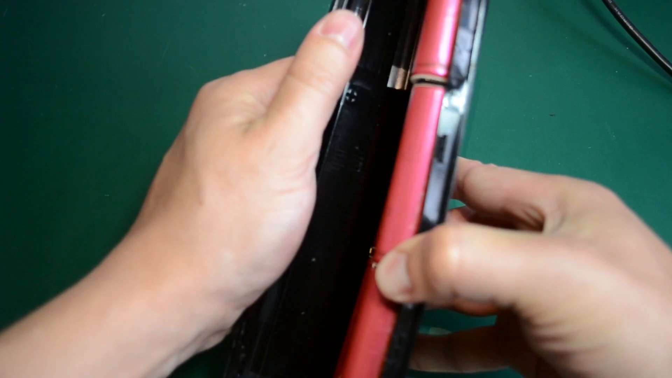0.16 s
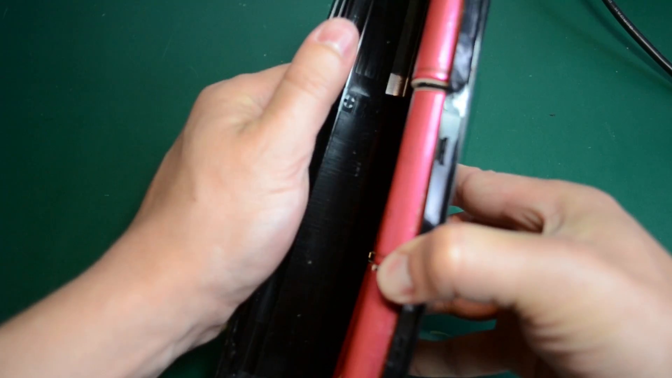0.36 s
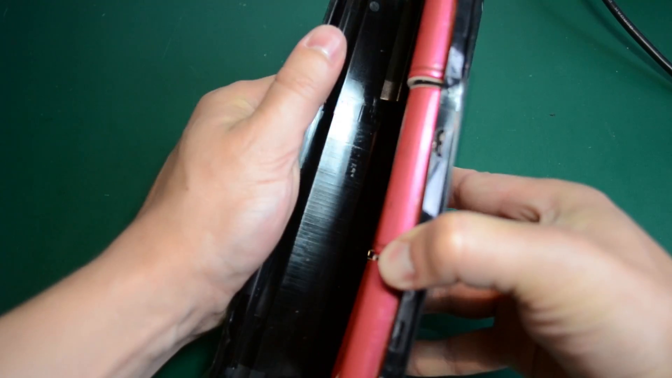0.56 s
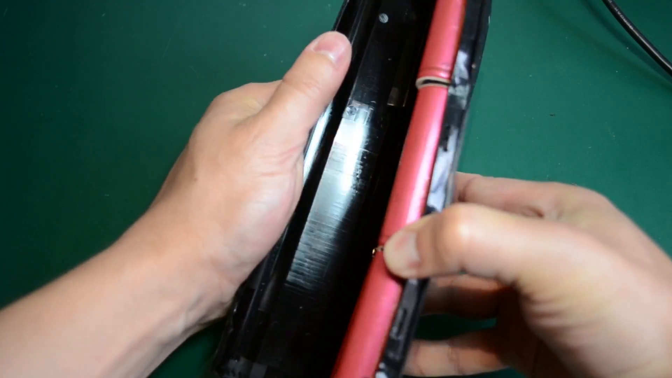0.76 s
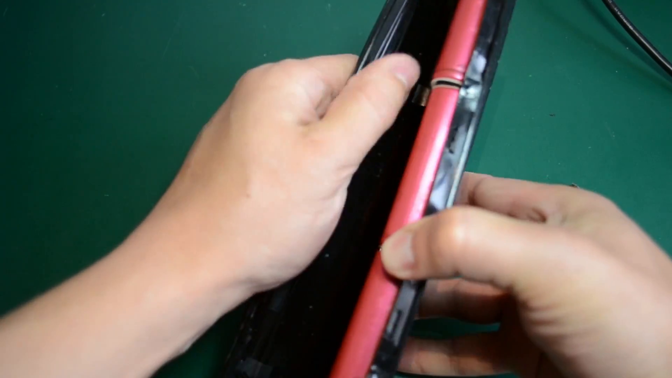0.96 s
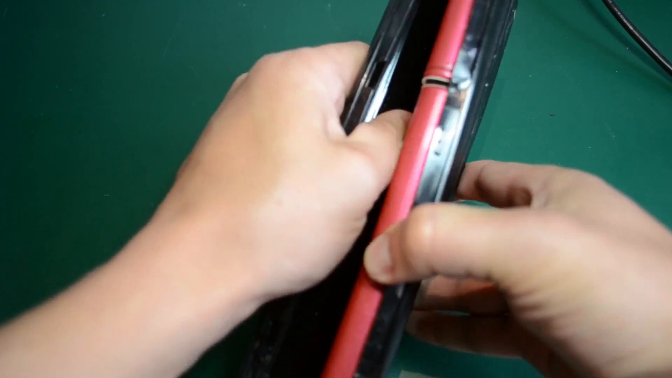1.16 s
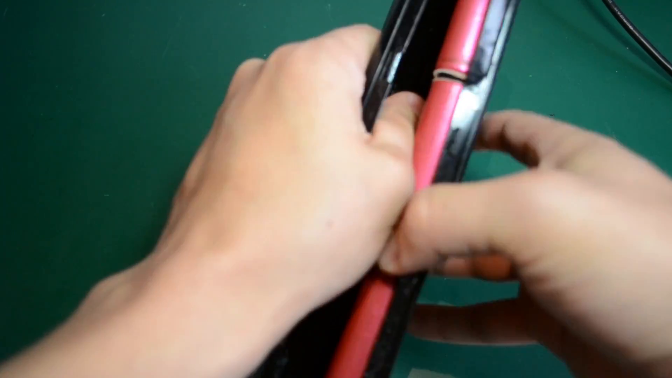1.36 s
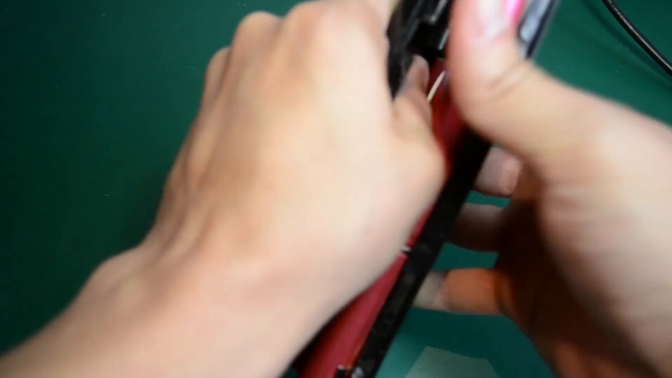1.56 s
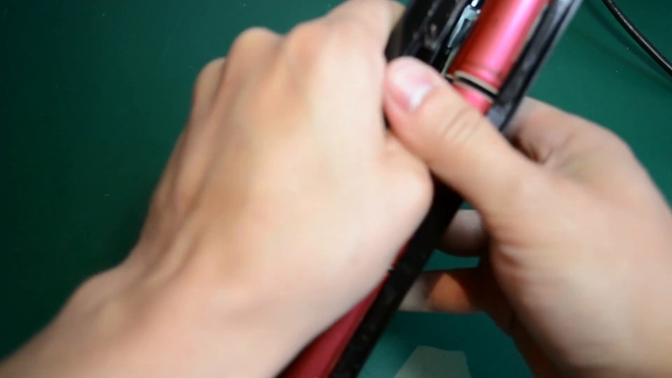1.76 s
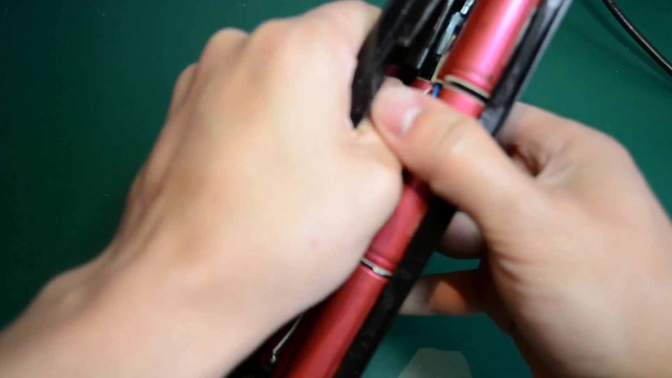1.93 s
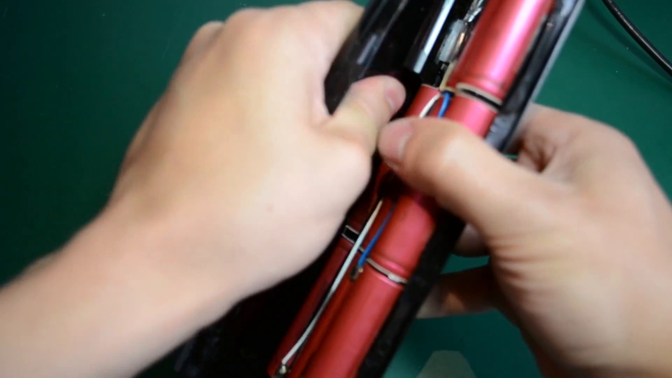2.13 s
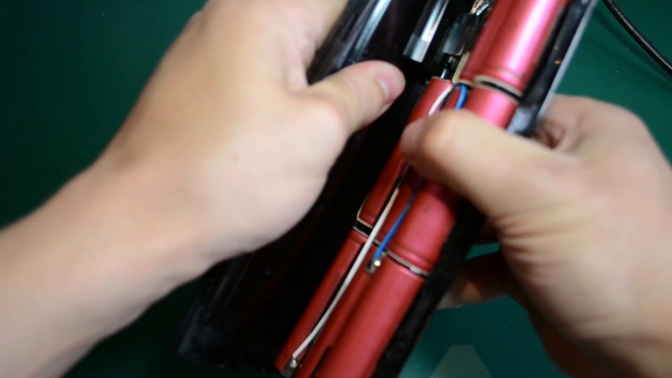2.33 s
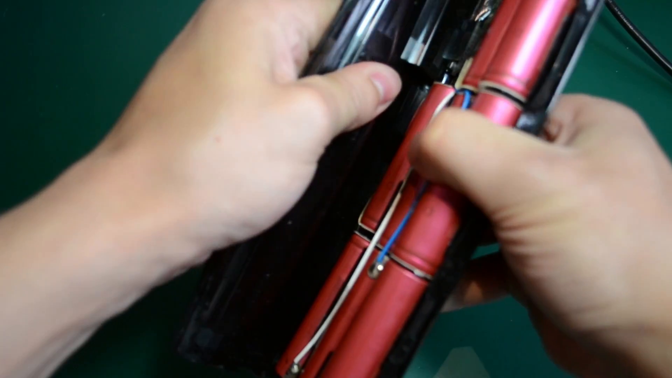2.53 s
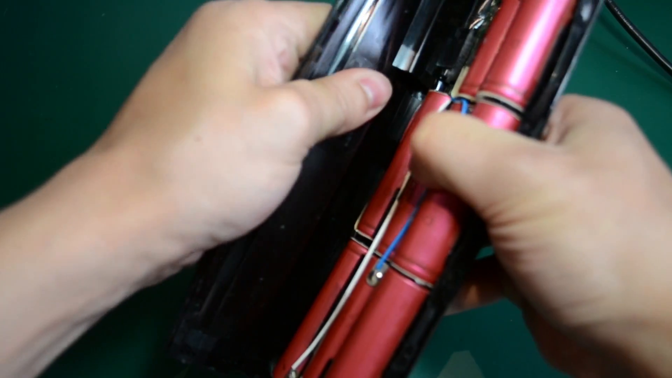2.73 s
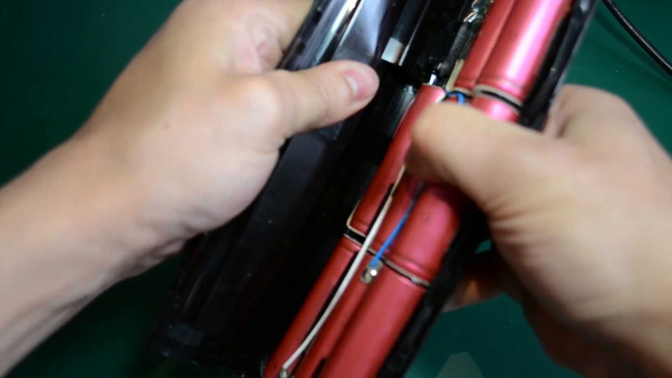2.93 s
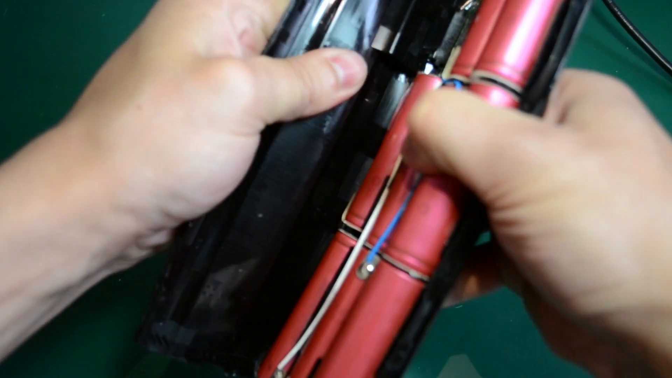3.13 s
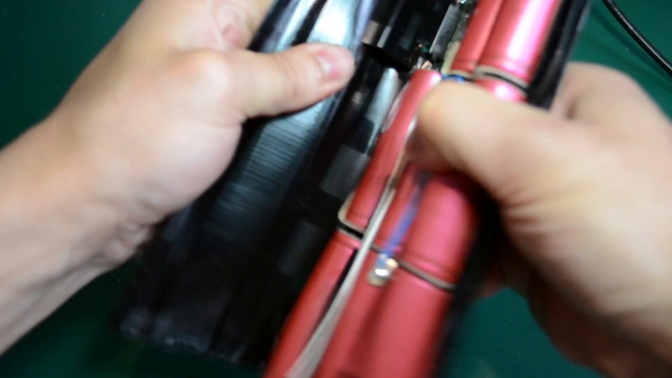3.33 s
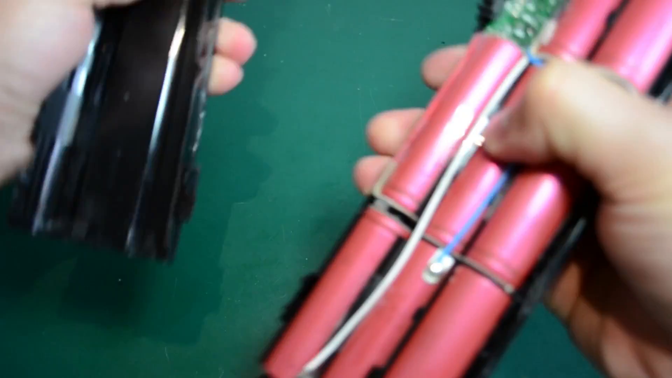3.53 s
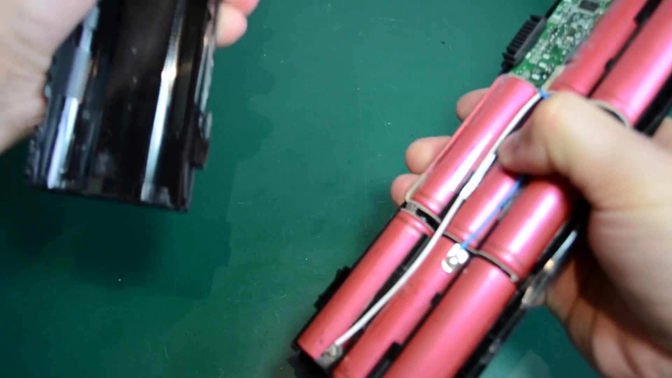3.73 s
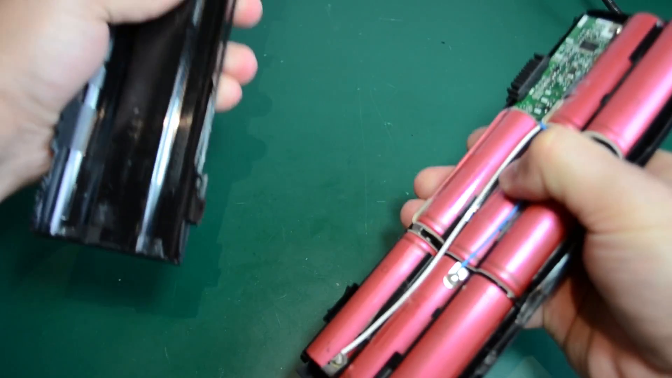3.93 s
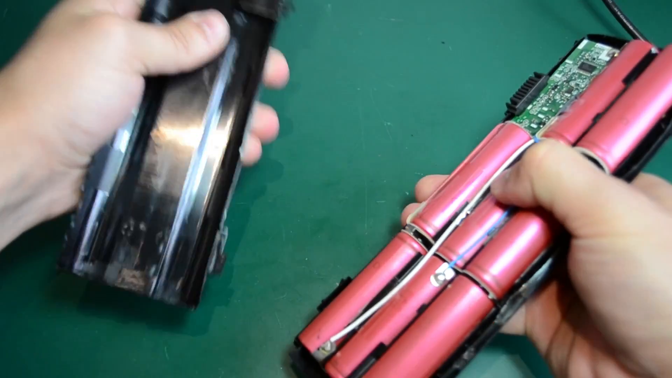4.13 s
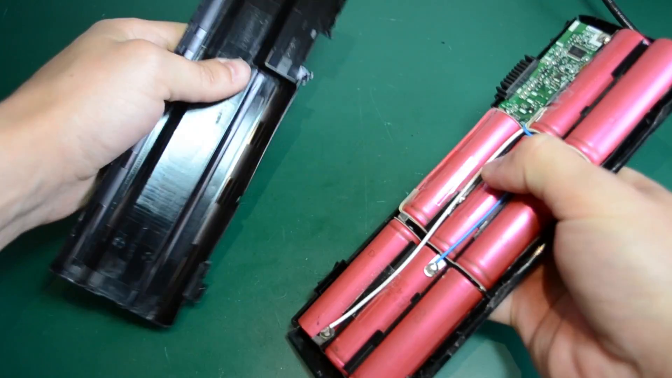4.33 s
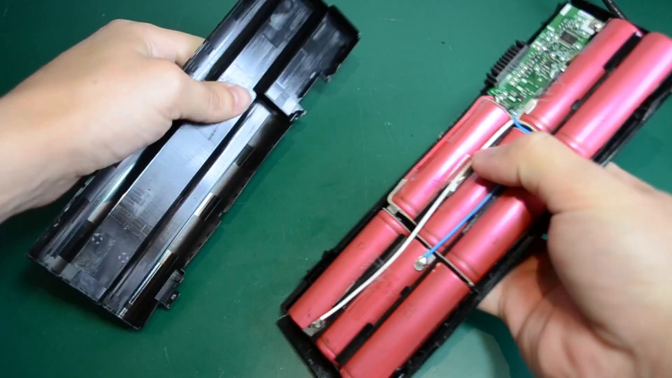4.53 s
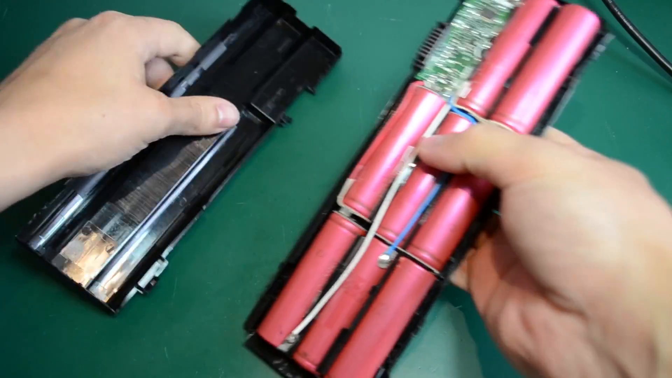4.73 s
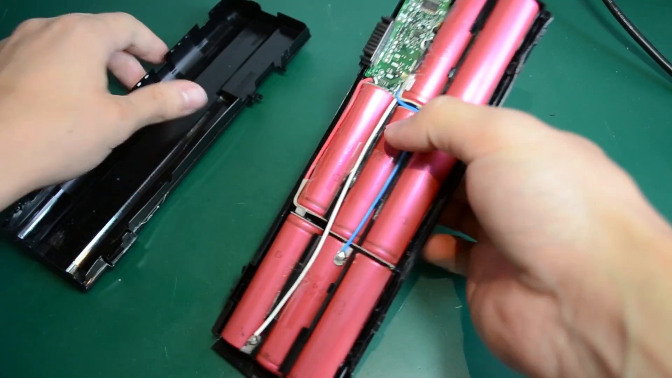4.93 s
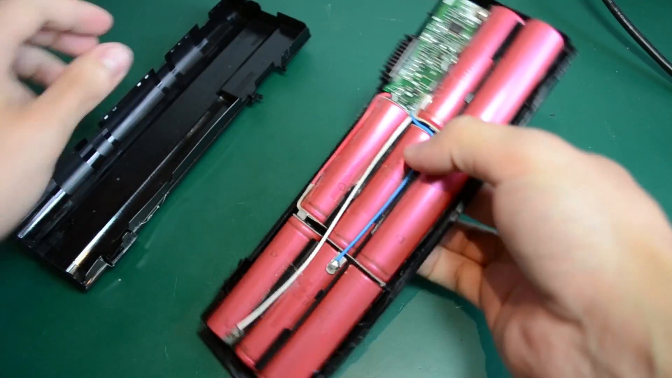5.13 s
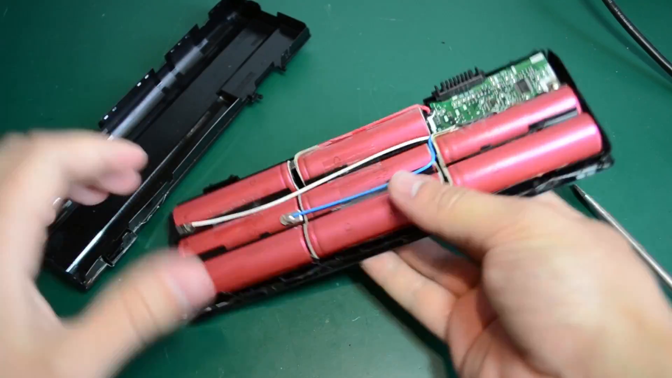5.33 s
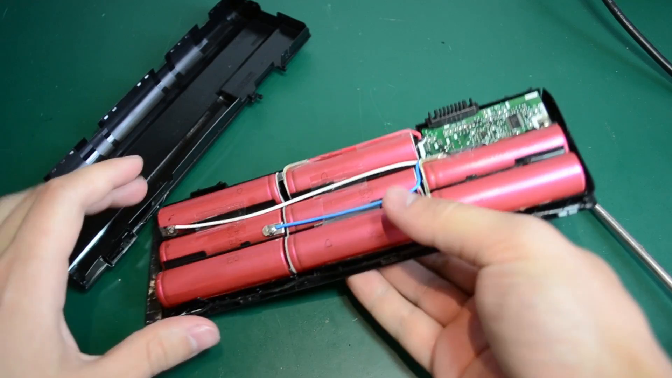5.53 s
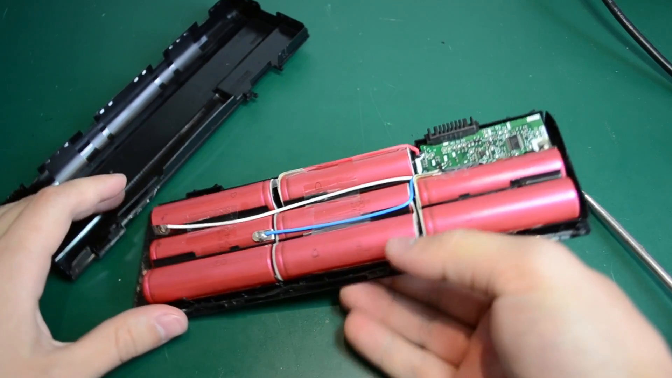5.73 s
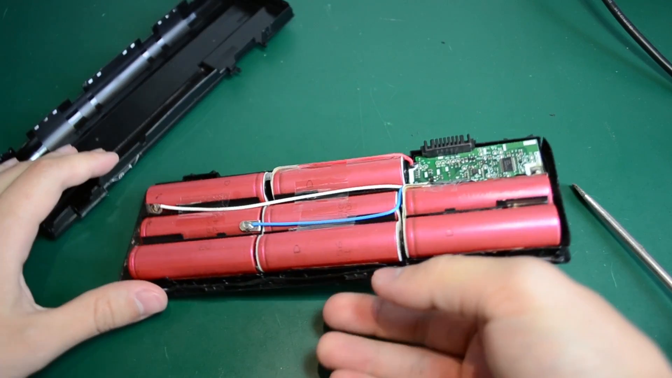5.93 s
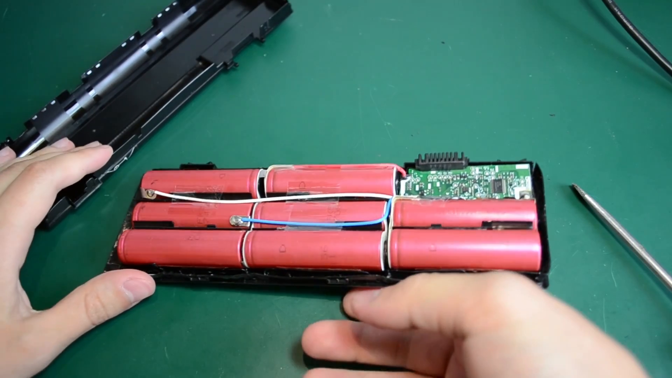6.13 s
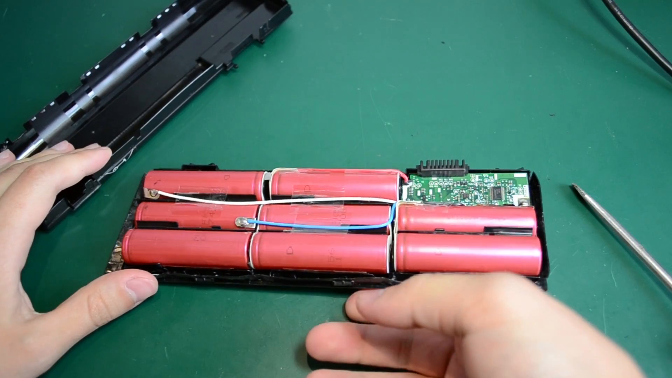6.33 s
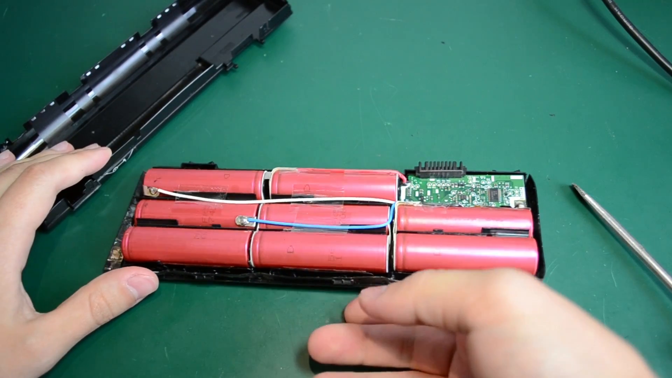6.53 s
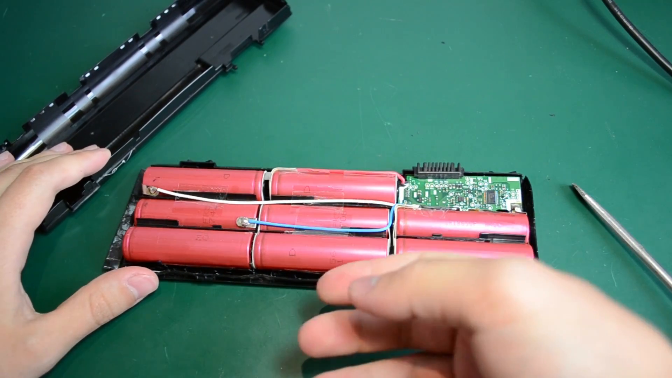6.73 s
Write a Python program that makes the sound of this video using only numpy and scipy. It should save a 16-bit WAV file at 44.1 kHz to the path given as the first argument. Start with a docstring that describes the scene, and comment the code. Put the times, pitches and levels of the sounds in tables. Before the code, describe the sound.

Hands pull a hard plastic shell apart above a desk, miked very near so the biggest snaps slightly overload. Three violent cracks with short bright room tails are separated by tiny ticks, seam creaks and notch-like pops. After the last, the loose lid chatters briefly. Softer clacks follow as it is put down, then a gritty slide and a dull knock on the matted desk, over steady quiet hush.

```python
"""The plastic case of a battery pack is prised open by hand, close to a microphone above a desk.
Three catches let go with cracks: short noise plus the ringing shell, rounded off by the overloaded microphone.
Between them the lid ticks and creaks in small slips; freed, it slaps against the pack and is laid aside.
The pack slides over the mat as grainy noise and is set down with a thud from mat and desk top.
Contacts get a noise tail for the small hard room, and a steady hush lies under everything."""
import sys
import numpy as np
from scipy import signal
from scipy.fft import rfft, irfft, next_fast_len
from scipy.io import wavfile
from scipy.ndimage import map_coordinates

SR = 44100
rng = np.random.default_rng(int(sys.argv[2]) if len(sys.argv) > 2 else 0)


def file_out(sig):
    """Save sig as 16-bit WAV at sys.argv[1]."""
    # one column per channel
    cols = np.atleast_2d(sig).T
    # limit, then scale
    lim = np.clip(cols, -1, 1)
    pcm = np.round(lim * 32767).astype(np.int16)
    wavfile.write(sys.argv[1], SR, pcm)


N = 298557  # length in samples
BLOW_SAMPLES = 4096  # length of a blow without its room tail

# quiet room hush, only the shape counts: (f/Hz, level/dB)
HUSH_COLOUR = [(25, -12.5), (60, -16.5), (125, -10.5), (230, -7), (400, -4.5), (750, -6.5), (1100, -4),
               (1500, -9.5), (2000, -4.5), (2400, -10), (3500, -10.5), (5000, -20.5), (9000, -31.5),
               (15000, -48.5)]
# how long the room rings, as time to fall by 60 dB: (f/Hz, t/s)
ROOM_DECAY = [(150, 0.34), (600, 0.21), (1300, 0.27), (2700, 0.43), (5000, 0.38), (9000, 0.36),
              (15000, 0.27)]
# tone of the room's answer: (f/Hz, level/dB)
ROOM_TONE_COLOUR = [(100, -22.5), (450, -8), (750, -5), (1400, -1.5), (4000, 0), (6500, 0), (7900, -1),
                    (9000, -0.5), (10500, -3), (15000, -6.5)]
# room resonances that linger after a loud blow: (f/Hz, width/Hz, level/dB)
LINGERING_RESONANCES = [(390, 60, 4), (660, 50, -0.5), (1017, 35, -4), (1340, 90, -4), (1690, 58, -4),
                        (1890, 54, -2), (2420, 50, -6), (2630, 67, -12.5), (3720, 130, -4.5),
                        (3950, 50, -3.5), (4707, 50, -5)]
# ringing tones of the plastic shell: (f/Hz, level/dB, time to fall by 60 dB t/s)
SHELL_MODES = [(841, -20, 0.093), (1157, 0, 0.019), (1315, 2, 0.038), (1584, -0.5, 0.044), (1900, 1, 0.041),
               (2340, -4.5, 0.032), (2915, -15, 0.14), (3984, -22.5, 0.014), (4070, -22.5, 0.041),
               (4470, -21.5, 0.06)]
# the shell's ring as heard from all sides: (f/Hz, level/dB)
SHELL_ALL_ROUND_COLOUR = [(650, -18.5), (1150, 0.5), (1800, 0.5), (2500, -7), (3200, -6.5), (5000, -24.5)]
# tone of the noise in a plastic crack: (f/Hz, level/dB)
CRACK_COLOUR = [(60, -5.5), (300, -6.5), (700, 7), (2500, 5), (6000, 1.5), (7700, -4), (9200, -0.5),
                (11000, -9.5), (15000, -17)]
# bass push of a flexing wall, heard only close by: (f/Hz, level/dB)
FLEX_COLOUR = [(40, -15), (140, -8), (320, -3)]
# catches letting go: (t/s, level/dB, bass level/dB, treble level/dB, struck spot f/Hz,
#   spot boost level/dB, shell ring level/dB, room level/dB)
CATCH_SNAPS = [(0.0861, -5, -0.5, -4, 1170, 8, 8, -19), (0.092, -16, -11.5, -7.5, 1880, 7.5, 3.5, -12),
               (2.4332, -6, 11.5, 8.5, 3892, 8.5, -8.5, -10), (3.3816, -2.5, 6, 3.5, 1000, 5, -14.5, -10.5)]
# clearer ticks of the plastic: (t/s, level/dB, treble level/dB, struck spot f/Hz)
CLEAR_TICKS = [(0.2845, -51.5, -8, 2100), (0.317, -51, -13, 1970), (0.343, -55.5, 2.5, 1990),
               (0.4651, -46, 13, 3000), (0.6003, -57, -37, 1010), (0.636, -55.5, 1, 2330),
               (0.692, -50.5, -48, 1090), (0.731, -57, -15, 2000), (0.8504, -49.5, -8, 2400),
               (0.876, -54.5, 7, 7300), (0.9711, -50.5, -25, 1120), (1.023, -51, -10, 1960),
               (1.0871, -44.5, -12, 2700), (1.095, -45, -7, 1180), (1.2058, -44.5, -8, 1180),
               (1.2135, -48, -18, 1660), (1.3806, -49, 0, 2940), (1.4308, -45, -2, 1210),
               (1.4391, -41, -6, 2470), (1.5731, -52, -2.5, 1960), (1.9228, -47, 8, 3780),
               (1.933, -46.5, 3.5, 4160), (1.9761, -36, -19, 1625), (1.9811, -31.5, -8.5, 1060),
               (3.3386, -51, 14, 4930), (3.7226, -41, 8, 4100), (4.2103, -50.5, -14, 1113),
               (4.3029, -48.5, 1, 2520), (4.3506, -49.5, -13, 958), (4.9425, -25, 4.5, 4780),
               (4.9647, -33.5, -7, 4590), (6.588, -47.5, 8, 5100), (6.5967, -41.5, 8.5, 2140),
               (6.7372, -51, -16, 1450)]
# tone of a light tick: (f/Hz, level/dB)
TICK_BODY = [(450, -14), (700, 0), (1500, -1), (2800, 1), (5000, -0.5)]
# stretches of faint random ticking in the gripped plastic: (start t/s, end t/s)
STRAIN_STRETCHES = [(0.5, 1.1), (4.201, 4.4)]
# fingers shifting on the case: (start t/s, strongest t/s, end t/s, level/dB)
FINGER_RUBS = [(0.95, 1.3, 1.7, -70.5), (1.78, 2.15, 2.34, -63.5), (4.12, 4.3, 4.5, -66.5),
               (4.6, 4.9, 4.96, -58)]
# tone of rubbing, sliding and gritty scraping: (f/Hz, level/dB)
RUBBING_COLOUR = [(200, -42), (900, -3), (1500, -0.5), (2000, 7), (4000, 4.5), (7700, -3), (9500, -2),
                  (11000, -10.5), (15000, -20.5)]
# the seam dragging in quick slips: (t/s, length t/s, shell creak level/dB, gritty hiss level/dB)
SEAM_SCRAPES = [(1.059, 0.054, -49, -57), (1.144, 0.1, -51.5, -59.5), (1.311, 0.15, -56.5, -61),
                (1.413, 0.079, -52, -54.5), (1.687, .13, -57.5, -66), (4.322, 0.03, -62, -58),
                (4.693, 0.063, -54, -59)]
# the seam giving way notch by notch: (t/s, level/dB, treble level/dB)
SEAM_NOTCHES = [(2.544, -43.5, -37), (2.6463, -46, -66), (2.763, -43.5, -35), (2.8616, -43, -5.5),
                (2.963, -36, -8), (3.0502, -31, -18), (3.1628, -40, -31), (3.1773, -50, 0)]
# tone of a seam notch: (f/Hz, level/dB)
NOTCH_BODY = [(480, -23), (720, -1), (1050, -1), (1700, -5.5), (2700, 6), (4500, -4)]
# freed lid slapping the pack: (t/s, level/dB, bass level/dB, treble level/dB, struck spot f/Hz)
LID_SLAPS = [(3.388, -11, 7, 3.5, 2720), (3.395, -12, 19.5, -6, 960), (3.405, -15, 18, -2.5, 824),
             (3.41, -13, 8.5, -2.5, 1310), (3.4185, -19, 7, -3, 1900), (3.4245, -15, 3, 1.5, 5130),
             (3.4653, -23.5, -3, 0, 3750)]
# lid and pack touching down: (t/s, clack level/dB, treble level/dB, struck spot f/Hz,
#   desk ring level/dB, dull knock level/dB)
TOUCHDOWNS = [(4.3425, -47, -22, 737, -62, -56), (4.4103, -33, -14, 1102, -55.5, -48),
              (4.675, -33, -4.5, 1224, -60, -53), (4.945, -26, 4, 3096, -48, -41),
              (5.43, -48, -11, 3330, -61, -73), (6.6072, -32, 3, 2250, -61, -53),
              (6.615, -25.5, 3, 2520, -32.5, -28.5), (6.626, -34.5, -5, 2230, -53, -64)]
# tone of the dull knock on the mat: (f/Hz, level/dB)
KNOCK_COLOUR = [(20, -16), (60, -5), (230, 18.5), (350, 26), (540, 20.5), (820, 10.5), (1600, -33),
                (6000, -56)]
# ringing tones of the desk top: (f/Hz, level/dB, time to fall by 60 dB t/s)
DESK_MODES = [(69.96, -21, 0.45), (128.4, -0.5, 0.35), (190, -4.5, 0.21), (268, -3, .12), (367, -5.5, 0.18),
              (460, 2, 0.06)]
# the pack sliding on the mat: (start t/s, fastest t/s, end t/s, level/dB)
PACK_SLIDES = [(5.2, 5.3, 5.41, -55.5), (5.715, 5.94, 6.12, -49.5)]
# the microphone's steep treble notch: (f/Hz, level/dB)
MICROPHONE_COLOUR = [(10300, -2), (11300, -11.5), (12100, -32), (12900, -10), (14000, -6), (15500, -11.5)]


def amp(db):
    """Turn decibels into a gain."""
    return 10 ** (np.asarray(db) / 20)


def unit(x):
    """Scale x to rms 1."""
    return x / np.sqrt(np.mean(x ** 2) + 1e-20)


def normed(x):
    """Scale x to energy 1."""
    return x / np.linalg.norm(x)


def along(points, hz):
    """Read (f/Hz, value) points at any frequency, on a log axis."""
    f, v = np.transpose(points)
    return np.interp(np.log(hz + 1), np.log(f + 1), v)


def add(track, s, sound):
    """Mix a sound into the track from time s (seconds) on."""
    part = track[round(s * SR):][:len(sound)]
    part += sound[:len(part)]


def coloured(x, points):
    """Filter x to follow (f/Hz, level/dB) points, with no sound ahead of its cause."""
    m = 2 * next_fast_len(len(x) // 2 + 2048)
    log_gain = np.log(amp(along(points, np.fft.rfftfreq(m, 1 / SR))))
    # folding the cepstrum forward in time makes the filter minimum phase
    cepstrum = irfft(log_gain, m)
    cepstrum[1:m // 2] *= 2
    cepstrum[m // 2 + 1:] = 0
    return irfft(rfft(x, m) * np.exp(rfft(cepstrum)), m)[:len(x)]


def resonance(x, hz, q):
    """Keep the part of x that excites one resonance."""
    return signal.lfilter(*signal.iirpeak(hz, q, SR), x)


def room_tone():
    """The steady hush of the room: noise with a fixed colour."""
    hush_db = -61.5
    return amp(hush_db) * unit(coloured(rng.standard_normal(N), HUSH_COLOUR))


def ringing(modes, t, scatter_db):
    """A struck body rings in dying sine tones, whose strengths scatter at random by scatter_db."""
    hz, db, t60 = np.transpose(modes)[:, :, None]
    strength_db = db + scatter_db * rng.standard_normal(db.shape)
    tones = amp(strength_db - 60 * t / t60) * np.sin(2 * np.pi * hz * t)
    return np.sum(tones, 0)


def burst(t, t60):
    """Countless overlapping tones merge into noise that falls by 60 dB in t60 seconds."""
    return rng.standard_normal(len(t)) * amp(-60 * t / t60)


def room():
    """A small hard room answers one impulse with noise that dies at its own pace in each band."""
    noise = rng.standard_normal(int(0.55 * SR))
    hz, t, bands = signal.stft(noise, SR, nperseg=256)
    colour_db = along(ROOM_TONE_COLOUR, hz)[:, None]
    decay_db = -60 * t / along(ROOM_DECAY, hz)[:, None]
    tail = signal.istft(bands * amp(colour_db + decay_db), SR, nperseg=256)[1]
    buildup_s = 0.0074  # reflections take a moment to build up
    tail = tail * (1 - np.exp(-(np.arange(len(tail)) / SR / buildup_s) ** 2))
    return normed(tail)


def long_tail():
    """The room after a loud blow, with a few resonances standing out."""
    tail = room()
    lingering = sum(amp(db) * resonance(tail, hz, hz / width) for hz, width, db in LINGERING_RESONANCES)
    return tail + lingering


def short_tail():
    """The first quarter second of room, for a small sound that soon sinks into the hush."""
    return room()[:SR // 4]


def flexing(bass_db):
    """Colour of a blow that bends the whole wall and so pushes out bass."""
    return [(hz, db + bass_db) for hz, db in FLEX_COLOUR] + [(850, 0.0015)]


def blow(db, treble_db, body, spot_hz, spot_db, ring_db, crack_t60, tail, room_db):
    """A blow cracks and rings the shell and fills the room; harder contact gives more treble."""
    def voiced(x):
        """Add the treble of the contact and the ring of the struck spot."""
        x = coloured(x, [(1300, 0), (10000, treble_db)])
        return x + (amp(spot_db) - 1) * resonance(x, spot_hz, q=8)

    t = np.arange(BLOW_SAMPLES) / SR
    ring = normed(ringing(SHELL_MODES, t, scatter_db=0))
    crack = normed(coloured(burst(t, crack_t60), CRACK_COLOUR))
    direct = voiced(coloured(crack + amp(ring_db) * ring, body))
    # the room gathers sound from all sides of the shell, so it takes only the ring's broad colour
    room_crack = normed(coloured(tail, CRACK_COLOUR))
    room_ring = normed(coloured(tail, SHELL_ALL_ROUND_COLOUR))
    sound = amp(room_db) * voiced(room_crack + amp(ring_db) * room_ring)
    add(sound, 0, direct)
    # db is the level of the direct sound, with its energy counted over 8 ms
    return amp(db) * np.sqrt(0.008 * SR) / np.linalg.norm(direct) * sound


def snaps():
    """Each catch cracks as it lets go, rings the shell and fills the room."""
    track = np.zeros(N)
    for s, db, bass_db, treble_db, spot_hz, spot_db, ring_db, room_db in CATCH_SNAPS:
        snap = blow(db, treble_db, flexing(bass_db), spot_hz, spot_db, ring_db,
                    crack_t60=0.024, tail=long_tail(), room_db=room_db)
        add(track, s, snap)
    return track


def tick(db, treble_db, spot_hz):
    """A light contact of plastic on plastic; the hardest ones are also the thinnest."""
    thin_db = 0.85 * max(treble_db, 0)  # low body lost for each dB of extra treble
    body = [(hz, level - thin_db * (hz < 1000)) for hz, level in TICK_BODY]
    return blow(db, treble_db, body, spot_hz, spot_db=8.5, ring_db=-10.5,
                crack_t60=0.043, tail=short_tail(), room_db=-15)


def ticks():
    """The strained case ticks and loose parts knock together in light contacts."""
    track = np.zeros(N)
    for s, db, treble_db, spot_hz in CLEAR_TICKS:
        add(track, s, tick(db, treble_db, spot_hz))
    return track


def faint_ticks():
    """Under the grip, tiny slips come at random times and ring at random pitches."""
    ticks_per_s, middle_db = 8, -59
    track = np.zeros(N)
    for start, end in STRAIN_STRETCHES:
        length = end - start
        for when, strength, hardness, place in rng.random((round(ticks_per_s * length), 4)):
            db = middle_db + 5 * (strength - 0.5)
            faint = tick(db, treble_db=-15 + 22 * hardness, spot_hz=1000 + 1800 * place)
            add(track, start + when * length, faint)
    return track


def grains(rate, spread_db):
    """Sparse random slips, about rate a second and uneven in size, at rms 1."""
    happens = rng.random(N) < rate / SR
    return unit(happens * rng.standard_normal(N) * amp(spread_db * rng.random(N)))


def wobble(rate):
    """A smooth random curve through rate random points a second."""
    knots = rng.standard_normal(int(N * rate / SR) + 4)
    return map_coordinates(knots, [np.arange(N) * rate / SR])


def stroke(rows, swell_db, fade_s):
    """Loudness of rubbing strokes: each sets in, swells to its peak, slackens and stops."""
    t = np.arange(N) / SR
    loudness = np.zeros(N)
    for start, peak, end, db in rows:
        swell = np.interp(t, [start, peak, end], [-swell_db, 0, -swell_db])
        fade = np.clip(np.minimum(t - start, end - t) / fade_s + 0.5, 0, 1)
        loudness += amp(db + swell) * fade
    return loudness


def finger_rubbing():
    """Fingers shift on the case in fits and starts: noise and slips under an unsteady grip."""
    rough = rng.standard_normal(N) + 0.61 * grains(rate=220, spread_db=8.5)
    skin = unit(coloured(rough, RUBBING_COLOUR))
    grip = unit(amp(2.5 * wobble(rate=25)))
    return stroke(FINGER_RUBS, swell_db=5, fade_s=0.033) * grip * skin


def scrapes():
    """Runs of tiny slips along the seam make the shell creak and the edge hiss."""
    track = np.zeros(N)
    shell = ringing(SHELL_MODES, np.arange(BLOW_SAMPLES) / SR, scatter_db=1)
    slips = grains(rate=1100, spread_db=11)
    creak = signal.fftconvolve(slips, shell)  # every slip rings the shell
    grit = coloured(slips, RUBBING_COLOUR)
    for s, length, creak_db, grit_db in SEAM_SCRAPES:
        drag = np.hanning(int(length * SR))
        part = slice(round(s * SR), round(s * SR) + len(drag))
        mix = amp(creak_db) * unit(creak[part]) + amp(grit_db) * unit(grit[part])
        add(track, s, drag * mix)
    return track


def notches():
    """Under a steady pull the seam slips notch by notch, always ringing at the same spot."""
    track = np.zeros(N)
    for s, db, treble_db in SEAM_NOTCHES:
        notch = blow(db, treble_db, NOTCH_BODY, spot_hz=2650, spot_db=8.5, ring_db=-10.5,
                     crack_t60=0.037, tail=short_tail(), room_db=-14)
        add(track, s, notch)
    return track


def slaps():
    """Freed by the last catch, the lid chatters against the pack as it swings away."""
    first_room_db, room_db_per_s = -4, 202  # the room's share grows as the lid swings away
    track = np.zeros(N)
    for s, db, bass_db, treble_db, spot_hz in LID_SLAPS:
        room_db = first_room_db + room_db_per_s * (s - LID_SLAPS[0][0])
        slap = blow(db, treble_db, flexing(bass_db), spot_hz, spot_db=4.5, ring_db=-15.5,
                    crack_t60=0.036, tail=long_tail(), room_db=room_db)
        add(track, s, slap)
    return track


def landings():
    """Plastic clacks, the mat softens the weight to a dull knock, and the desk top booms."""
    track = np.zeros(N)
    t = np.arange(SR // 2) / SR
    for s, clack_db, treble_db, spot_hz, desk_db, knock_db in TOUCHDOWNS:
        thump = 1.03 * burst(t, t60=0.023)
        knock = coloured(thump + amp(25) * room()[:len(t)], KNOCK_COLOUR)  # it carries into the room
        soft_start = 1 - np.exp(-t / 0.0014)
        boom = ringing(DESK_MODES, t, scatter_db=2) * soft_start
        add(track, s, amp(knock_db) * knock + amp(desk_db) * boom)
        add(track, s, tick(clack_db, treble_db, spot_hz))
    return track


def pack_sliding():
    """The pack slides on the mat with a grainy hiss: noise and many small slips, unsteady in level."""
    rough = rng.standard_normal(N) + 0.5 * grains(rate=500, spread_db=10)
    mat = unit(coloured(rough, RUBBING_COLOUR))
    unsteady = amp(1.47 * wobble(rate=42))
    return stroke(PACK_SLIDES, swell_db=10.5, fade_s=0.033) * unsteady * mat


def scene():
    """Everything added up at the one microphone."""
    opening = room_tone() + snaps() + ticks() + faint_ticks() + finger_rubbing() + scrapes()
    release = notches() + slaps() + landings() + pack_sliding()
    return (opening + release)[None]


def record(dry):
    """The microphone has a treble notch and rounds off the loudest cracks; a band limit follows."""
    ceiling, hardness, top_hz = 0.7, 4, 15700
    x = coloured(dry[0], MICROPHONE_COLOUR)
    x = x / (1 + abs(x / ceiling) ** hardness) ** (1 / hardness)
    band_limit = signal.ellip(10, 0.1, 80, top_hz, fs=SR, output="sos")
    return signal.sosfilt(band_limit, x)[None]


dry = scene()
out = record(dry)
file_out(out)
```